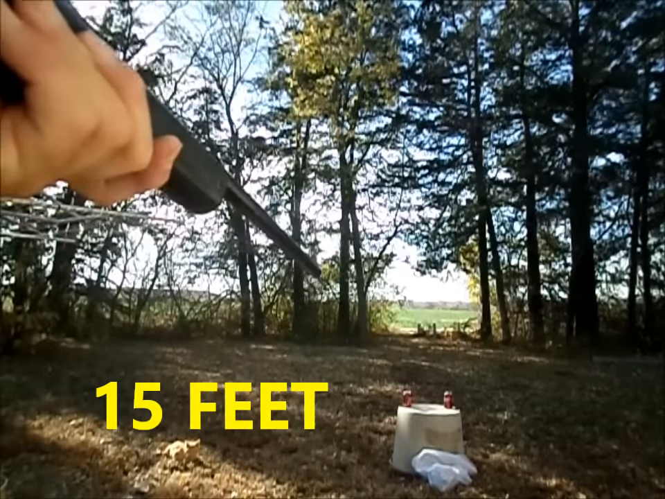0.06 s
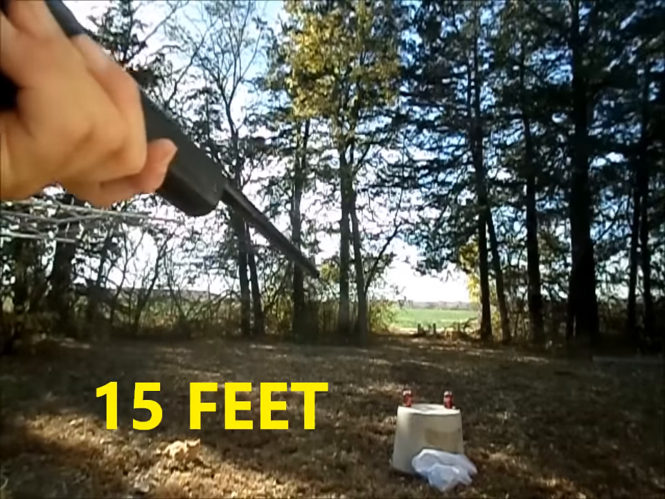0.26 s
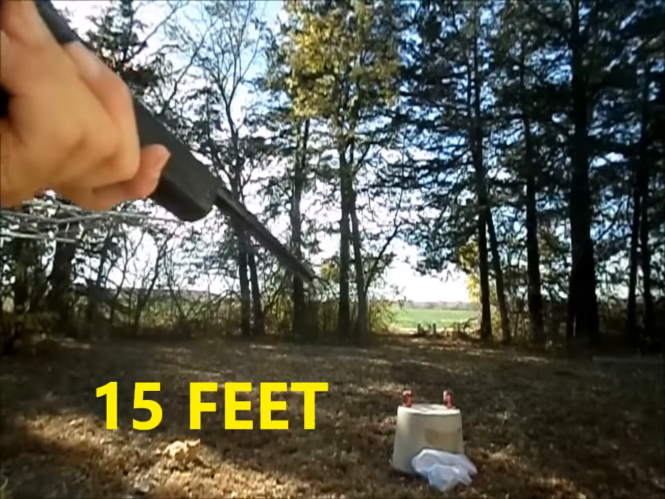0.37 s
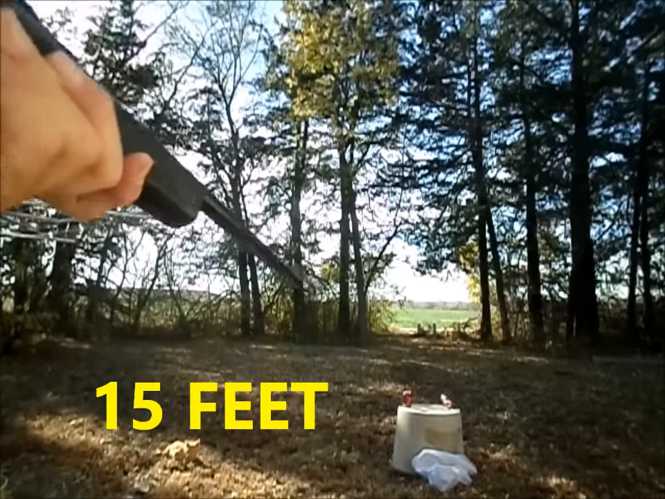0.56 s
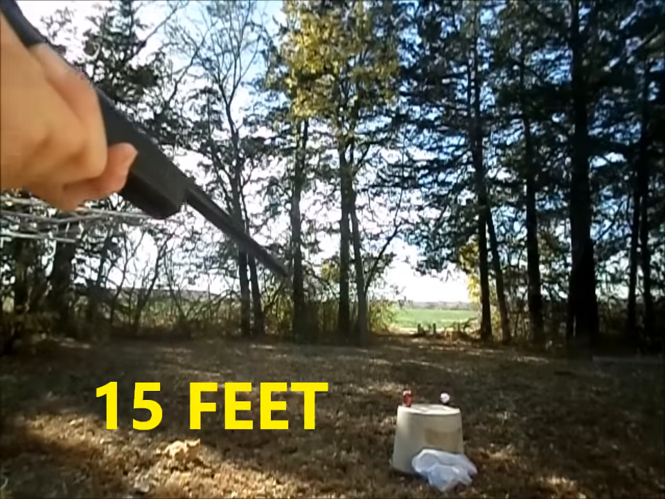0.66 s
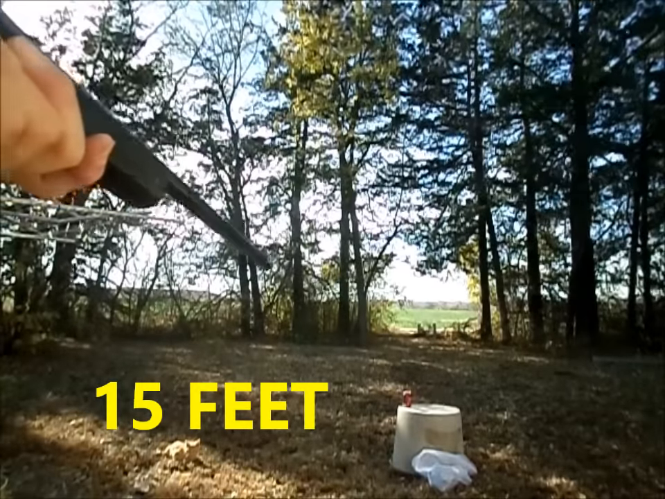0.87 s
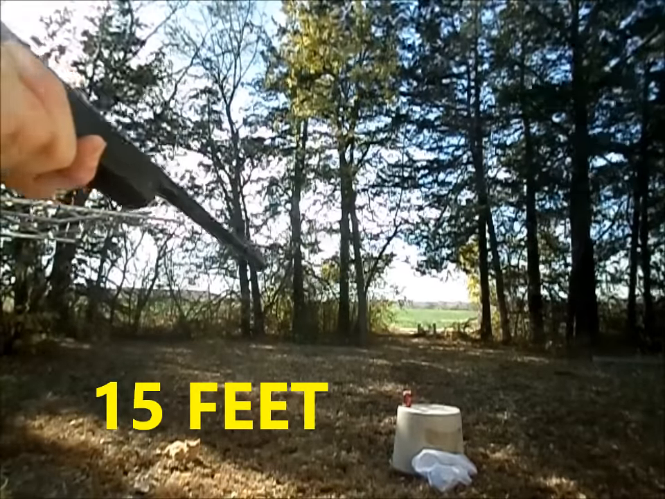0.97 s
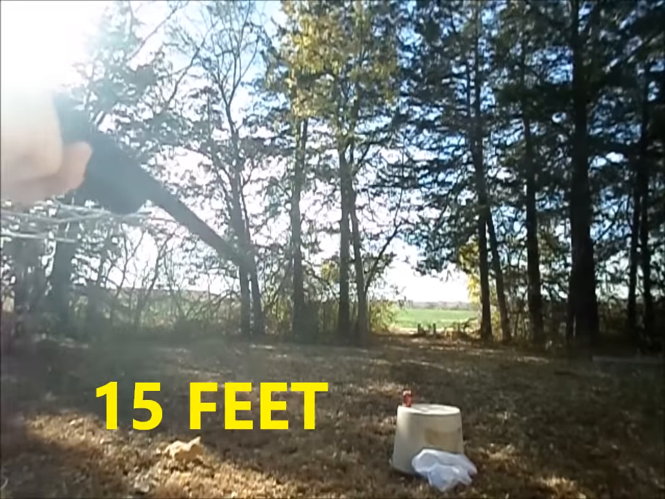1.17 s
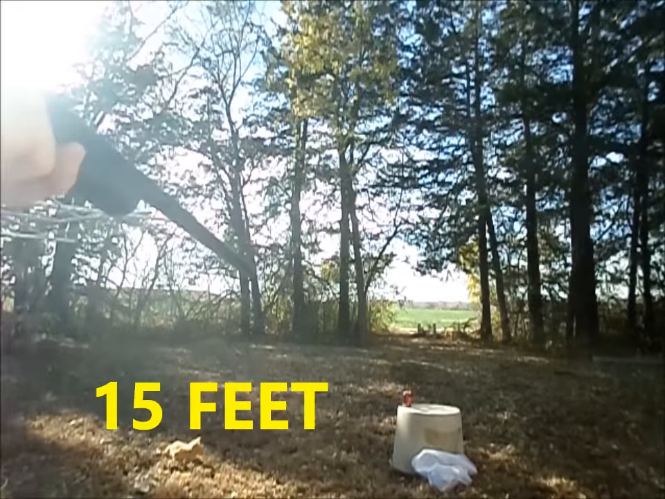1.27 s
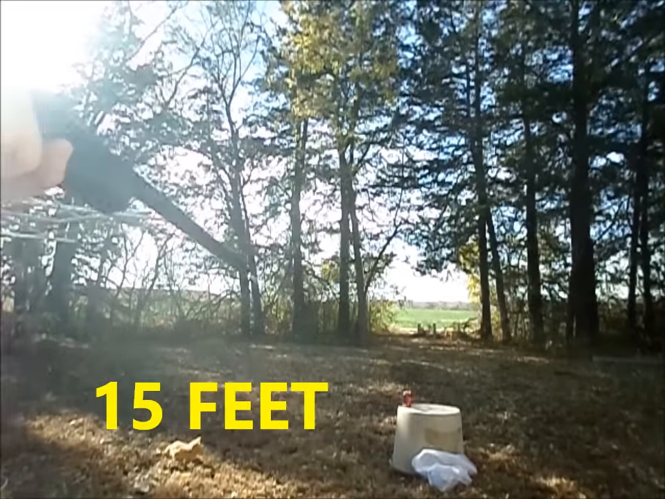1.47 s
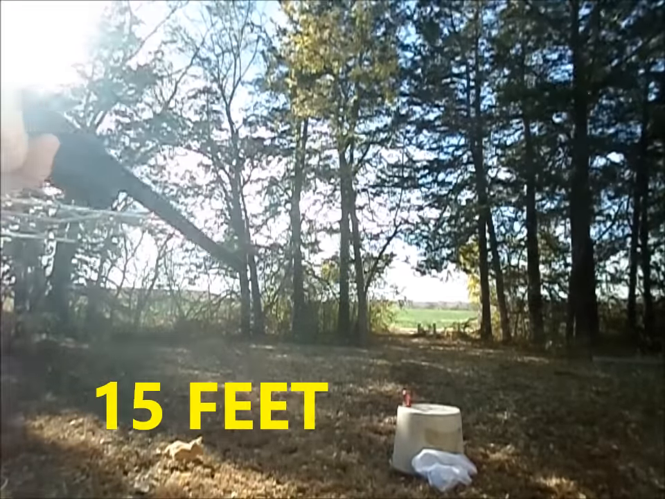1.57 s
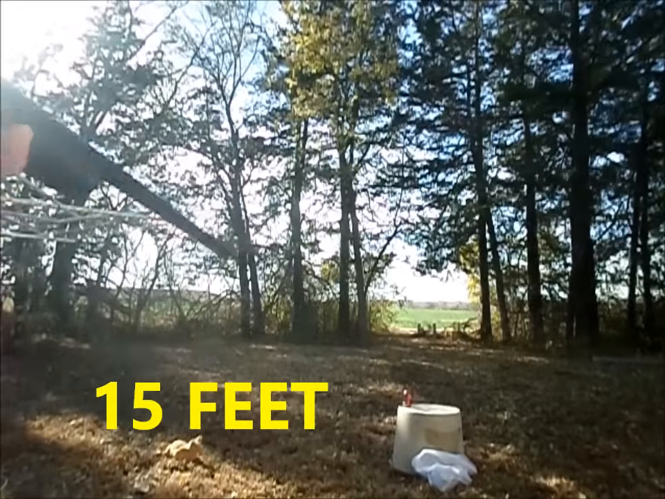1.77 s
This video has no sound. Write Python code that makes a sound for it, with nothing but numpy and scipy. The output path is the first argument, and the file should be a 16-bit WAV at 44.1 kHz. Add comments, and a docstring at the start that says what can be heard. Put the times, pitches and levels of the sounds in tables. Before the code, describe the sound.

Two close air rifle shots snap with a brief spring buzz, outdoors in faint wind. Each pellet cracks into a drink can a few metres away, the first flying off ringing. The trigger clicks after each, and trees echo briefly.

```python
"""Faint wind blows outdoors. Close by, a spring air rifle fires: its steel parts clack, its spring
buzzes and its piston thumps. The pellet smacks a drink can a few metres away, which flies off
ringing, and the trigger clicks back. Just over a second after the first shot, a second one hits
another can, and the trigger clicks again. Trees scatter a short tail of sound after each shot."""
import sys
import numpy as np
from scipy import signal
from scipy.fft import irfft
from scipy.io import wavfile
from scipy.ndimage import uniform_filter1d

SR = 44100
rng = np.random.default_rng(int(sys.argv[2]) if len(sys.argv) > 2 else 0)


def wav_out(sig):
    """Save sig, one row per channel (or a flat mono array), as 16-bit PCM at SR to the path in sys.argv[1]."""
    wavfile.write(sys.argv[1], SR, np.round(np.clip(np.atleast_2d(sig).T, -1, 1) * 32767).astype(np.int16))


N = 79380  # 1.8 seconds


def amp(db):
    """Turns decibels (dB) into a number to multiply a sound by."""
    return 10 ** (np.asarray(db) / 20)


def seconds(length):
    """The time of each sample, in seconds."""
    return np.arange(int(length * SR)) / SR


def read(points, hz):
    """Looks up values between a table's rows, giving every octave equal room."""
    pitches, values = np.transpose(points)
    return np.interp(np.log(hz + 1), np.log(pitches + 1), values)


def add(mix, start, sound):
    """Mixes a sound in at a start time in seconds."""
    part = mix[round(start * SR):][:len(sound)]
    part += sound[:len(part)]


def noise(colour, size):
    """Noise of strength 1. Its colour is a table of how strong the low and high pitches are."""
    hz = np.fft.rfftfreq(size, 1 / SR)
    phases = np.exp(2j * np.pi * rng.random(len(hz)))
    x = irfft(amp(read(colour, hz)) * phases, size)
    return x / x.std()


def grain(size):
    """Quick random unevenness of strength 1."""
    x = uniform_filter1d(rng.standard_normal(size), size=30)
    return x / x.std()


def burst(colour, db, fade, size=8192):
    """A blow wakes countless close tones, heard as dying noise. A fade is the time to drop 60 dB."""
    return noise(colour, size) * amp(db - 60 * np.arange(size) / SR / fade)


def ring(tones, db):
    """A struck object rings with a few tones, each dying at its own speed."""
    t = seconds(1)
    return sum((-1) ** k * amp(db + level - 60 * t / fade) * np.sin(2 * np.pi * hz * t)
               for k, (hz, level, fade) in enumerate(tones))


def background():
    """Faint wind in the trees, a low wavering hum and small rustles."""
    # Colours of the wind, its rumble and the rustles. Each row: pitch in Hz, level in dB.
    wind_colour = [(53, -45), (90, -15.5), (244, -7), (284, -3), (338, -9), (499, -10.5), (706, -11),
                   (839, -12.5), (998, -12.5), (2890, -21.5), (3290, -21), (4450, -24.5), (16000, -30)]
    rumble_colour = [(15, -13.5), (32, -3), (43, 0.5), (56, -6), (100, -19.5), (300, -50)]
    rustle_colour = [(500, -12.5), (3500, -2), (8000, -3), (15500, -8)]
    # The level drops at the first shot, then creeps partway back. Each row: time in seconds, level in dB.
    loudness = [(0, -44), (.2, -44), (.235, -46), (.285, -65), (.45, -67), (.6, -65), (.85, -63),
                (1.15, -62), (1.4, -58), (1.6, -56.5), (1.8, -57)]
    # Faint rustles. Each row: start in seconds, length in seconds, level in dB.
    rustles = [(.165, 0.057, -44.5), (0.583, .04, -70.5), (0.952, 0.093, -65), (1.16, .05, -69),
               (1.237, 0.038, -61)]
    t = np.arange(N) / SR
    drift = np.interp(t, np.linspace(0, t[-1], num=12), rng.standard_normal(size=12))
    hum_hz = 42.8 * (1 + .06 * drift)
    hum = amp(-7) * np.sqrt(2) * np.sin(2 * np.pi * np.cumsum(hum_hz) / SR)
    out = noise(wind_colour, N) + amp(-2) * noise(rumble_colour, N) + hum
    out *= amp(np.interp(t, *np.transpose(loudness)))
    for start, length, db in rustles:
        progress = np.clip((t - start) / length, 0, 1)
        out += amp(db) * noise(rustle_colour, N) * np.sin(np.pi * np.sqrt(progress))
    return out


def woods(sound):
    """Ground and trees send back one echo and a scattered tail, each pitch dying at its own speed."""
    # The scattered tail. Each row: pitch in Hz, level in dB, fade in seconds.
    scatter = np.array([(100, -36, .12), (200, -27.5, .13), (400, -19, 0.12), (1000, -18, 0.4),
                        (2500, -16.5, .31), (6000, -19.5, .3), (14000, -22, 0.23)])
    # Colour of the echo. Each row: pitch in Hz, level in dB.
    echo_colour = [(200, -3.5), (2500, 1.5), (7000, -8.5), (15000, -9)]
    hz, t, bands = signal.stft(rng.standard_normal(SR // 2), SR, nperseg=256)
    db = read(scatter[:, :2], hz)[:, None]
    fade = read(scatter[:, ::2], hz)[:, None]
    bands *= amp(db - 60 * t / fade)
    bands *= np.sqrt(2 * np.log(1000) / (fade * SR))  # a longer fade adds no extra energy
    response = np.zeros(SR)
    add(response, start=.011, sound=signal.istft(bands, SR, nperseg=256)[1])
    echo = burst(echo_colour, db=0, fade=.017, size=1024)
    add(response, start=.033, sound=amp(-25) * echo / np.linalg.norm(echo))
    return signal.fftconvolve(sound, response)[:N]


def flying_can():
    """The first can flies off: a quick rising chirp, and a faint ring that hangs on and then stops."""
    # Tones of the can in the air. Each row: pitch in Hz, level in dB, fade in seconds.
    tones = [(1016, -49.5, 1.4), (2030, -47.5, 0.64)]
    ring_start, ring_end, stopping_time = .29, .635, .043  # seconds
    chirp_seconds, from_hz, to_hz = .034, 430, 1350
    out, t = np.zeros(N), seconds(chirp_seconds)
    stop = np.clip((ring_end - ring_start - seconds(1)) / stopping_time, 0, 1)
    add(out, ring_start, ring(tones, db=0) * stop)
    hz = from_hz * (to_hz / from_hz) ** (t / chirp_seconds)
    swell = amp(-42) * np.sin(np.pi * t / chirp_seconds)
    add(out, start=.293, sound=swell * np.sin(2 * np.pi * np.cumsum(hz) / SR))
    return out


def cans():
    """A pellet cracks through each can's front, the metal crumples and rings, then the back wall snaps."""
    # Pellet hits. Each row: start in seconds, crack level in dB, crack fade in seconds,
    # ring level in dB, share sent to the trees in dB.
    hits = [(0.283, -8.5, 0.062, -29, -2.5), (1.5116, -6, 0.089, -22.5, 0)]
    # Colour of the crack, one table per can. Each row: pitch in Hz, level in dB.
    crack_colours = [
        [(100, -43.5), (330, -24), (540, -6), (1050, -6), (1450, -13), (1720, -6.5), (1950, -6), (2400, -1),
         (2900, -4), (3400, 0), (5200, -7.5), (5750, -4), (10500, -2.5), (15500, -3)],
        [(100, -28), (240, -39), (400, -14), (830, -4.5), (1250, -16.5), (1520, -34), (1800, -5.5),
         (2350, -7.5), (3300, 0.5), (4100, -5), (5800, -7), (7500, -3), (13500, -4.5), (15500, -7.5)],
    ]
    # Ringing tones, one table per can. Each row: pitch in Hz, level in dB, fade in seconds.
    can_tones = [
        [(557, -23.5, 0.096), (2556, -1, 0.13), (3110, -17.5, 0.37), (3280, 3.5, 0.099), (3680, -15.5, .18),
         (3920, -3, 0.11), (5680, 1.5, 0.12), (6492, -4.5, .11)],
        [(398.4, -12, 0.16), (586, -12.5, .12), (974, -26.5, 0.64), (1710, -3.5, 0.092), (1990, -7.5, 0.25),
         (2492, -8, 0.16), (3140, -10, 0.21), (3270, 0, 0.1), (3318, 3.5, 0.18), (3530, 1, 0.14),
         (4400, -13, 0.11), (5370, -9, 0.11), (5880, -9, 0.24), (7150, -7, 0.19)],
    ]
    crumple_db = 2
    out, to_trees = np.zeros(N), np.zeros(N)
    for (start, db, fade, ring_db, trees_db), colour, tones in zip(hits, crack_colours, can_tones):
        crack = burst(colour, db, fade)
        crack *= amp(crumple_db * grain(len(crack)))
        back_wall = burst(colour, db - 2.5, fade=.015, size=1024)
        add(crack, start=.0052, sound=back_wall)
        shell = ring(tones, ring_db)
        for sound, extra_db in (crack, 5.5), (shell, -1.5):
            add(out, start, sound)
            add(to_trees, start, amp(trees_db + extra_db) * sound)
    return out + woods(to_trees)


def trigger():
    """The trigger snaps back when let go, and the gun's body rings faintly."""
    # Trigger clicks. Each row: start in seconds, level in dB, fade in seconds, ring level in dB.
    clicks = [(0.388, -41, 0.023, -74), (0.4108, -22, 0.013, -27), (.4122, -29.5, .012, -33),
              (1.7032, -16.5, 0.012, -17), (1.7064, -20, 0.015, -28), (1.7963, -36.5, .02, -51)]
    # Colours of the click and of the gun's body. Each row: pitch in Hz, level in dB.
    click_colour = [(100, -41), (400, -28), (1000, -18), (1800, -20.5), (2600, -10), (4000, -3.5),
                    (6200, 5.5), (8500, -4.5), (10400, 1.5), (12000, -4), (15500, 1.5)]
    body_colour = [(300, -15), (1200, 0.5), (1800, -1.5), (2300, -6.5), (3500, 1), (5500, 2.5),
                   (8000, -2.5), (10400, 3.5), (15500, 0.5)]
    # The trigger's own tones. Each row: pitch in Hz, level in dB, fade in seconds.
    tones = [(1788, -12, 0.038), (2574, -9, 0.018), (4160, -10, 0.014), (5550, -7.5, 0.019),
             (6255, 2, 0.015), (10140, -1.5, 0.017), (13200, -3, .012)]
    out = np.zeros(N)
    for start, db, fade, ring_db in clicks:
        add(out, start, burst(click_colour, db, fade))
        add(out, start, burst(body_colour, db - 14, fade=.075))
        add(out, start, ring(tones, ring_db))
    return out


def spring(size=4096):
    """The spring's coils chatter in their tube, then come to rest."""
    # Buzzes of the spring. Each row: start in seconds, length in seconds, level in dB.
    buzzes = [(0.2038, .023, -18), (0.2289, 0.036, -14.5), (1.438, 0.027, -29.5), (1.4587, 0.042, -13.5)]
    # Colour of the buzz. Each row: pitch in Hz, level in dB.
    colour = [(80, -23.5), (300, -12), (900, -2), (1600, 0), (3000, 0.5), (5000, -2.5), (8000, 3),
              (15500, -0.5)]
    drop_db_per_second, chatter_db, settle_seconds = 229, 2.5, .0026
    out, t = np.zeros(N), np.arange(size) / SR
    for start, length, db in buzzes:
        level = amp(db - drop_db_per_second * t + chatter_db * grain(size))
        settle = np.exp(-np.maximum(t - length, 0) / settle_seconds)
        add(out, start, noise(colour, size) * level * settle)
    return out


def steel_parts():
    """The catch that holds the piston, the spring's guide rod and the piston clack against steel."""
    # Clacks. Each row: start in seconds, level in dB, fade in seconds, bright ring in dB above that level.
    clacks = [(0.2073, -7, 0.011, 2.5), (0.2109, -9.5, .02, 5.5), (.213, -2, 0.033, -4.5),
              (0.2185, 1, 0.0087, -5), (0.2258, -11.5, 0.014, 0), (0.231, -0.5, 0.018, -26),
              (0.2331, -5, 0.018, -21), (0.239, -2.5, .01, -19), (0.2498, -11, .008, -6),
              (0.2567, -8, .005, -11), (0.27, -38, .008, -11), (1.442, -15.5, 0.02, 2),
              (1.4462, -8.5, 0.015, -13), (1.4545, -21, 0.033, 2), (1.459, -14, .018, -4),
              (1.4638, -2.5, 0.024, -17), (1.4784, -9.5, .01, -1.5), (1.4849, -6.5, .005, -23.5),
              (1.491, -15, .01, -17), (1.4988, -37, .01, 7)]
    # Colours of the clack and of its bright ring. Each row: pitch in Hz, level in dB.
    steel_colour = [(60, -35), (200, -23.5), (500, -10.5), (1200, -5), (2500, -5.5), (4500, 1.5), (7000, 0),
                    (10000, -1.5), (15500, 1.5)]
    bright_colour = [(3000, -30.5), (5500, -11.5), (6400, 2.5), (7700, -1.5), (9000, -8.5), (15000, -21.5)]
    out = np.zeros(N)
    for start, db, fade, bright_db in clacks:
        add(out, start, burst(steel_colour, db, fade, size=1024))
        add(out, start, burst(bright_colour, db + bright_db, fade, size=1024))
    return out


def piston():
    """The piston pushes out a puff of air and knocks the stock (the gun's handle), which booms briefly."""
    # Slams and rebounds. Each row: start in seconds, then levels in dB of knock, puff, boom and bass push.
    thumps = [(0.2324, -15, -17, -19.5, -15.5), (0.2537, -19.5, -24, -40, -32),
              (1.4611, -13.5, -17, -20.5, -33), (1.4823, -15.5, -19, -37, -48)]
    # Tones of the stock's knock and low boom. Each row: pitch in Hz, level in dB, fade in seconds.
    knock_tones = [(289.4, -6, 0.031), (450, -3.5, .03), (645, -2, .035), (1078, 0, .03)]
    boom_tones = [(200.4, -1, .085), (112, -13.5, .025)]
    # Colour of the air puff. Each row: pitch in Hz, level in dB.
    puff_colour = [(60, -14), (200, -3), (650, 2.5), (1100, -1.5), (1700, -14), (3000, -12), (8000, -25)]
    push_seconds = .0014
    out, age = np.zeros(N), seconds(.5) / push_seconds
    push = np.e * age * (1 - age / 2) * np.exp(-age)  # pressure rises, dips below rest and settles
    for start, knock_db, puff_db, boom_db, push_db in thumps:
        add(out, start, ring(knock_tones, knock_db) + ring(boom_tones, boom_db))
        add(out, start, burst(puff_colour, puff_db, fade=.063, size=2048))
        add(out, start, amp(push_db) * push)
    return out


def scene():
    """The rifle, the cans and their tail from the trees, over the background, in one channel."""
    metal = steel_parts() + spring()
    thumps, clicks = piston(), trigger()
    tail = woods(amp(-2.5) * metal + amp(-4.5) * thumps + amp(-7.5) * clicks)
    return (metal + thumps + clicks + tail + cans() + flying_can() + background())[None]


def record(dry):
    """Flattens the loudest peaks, then removes the very highest treble."""
    peak_limit, top_hz = .95, 16100
    treble_cut = signal.firwin(511, top_hz, window=("kaiser", 9), fs=SR)
    return signal.oaconvolve(np.clip(dry, -peak_limit, peak_limit), treble_cut[None], "same")


dry = scene()
out = record(dry)
wav_out(out)
```